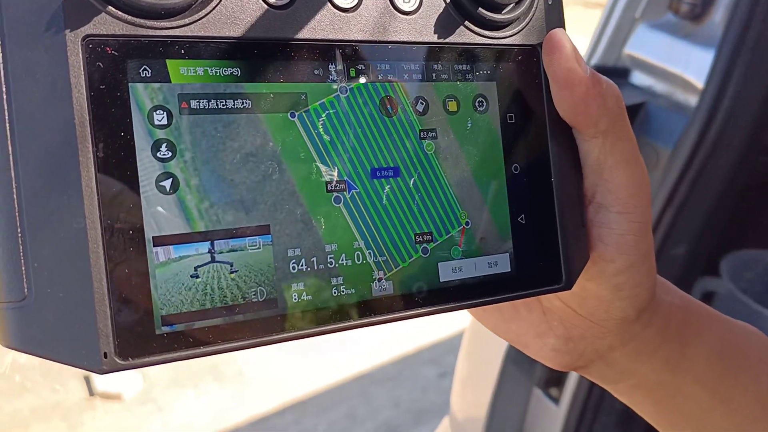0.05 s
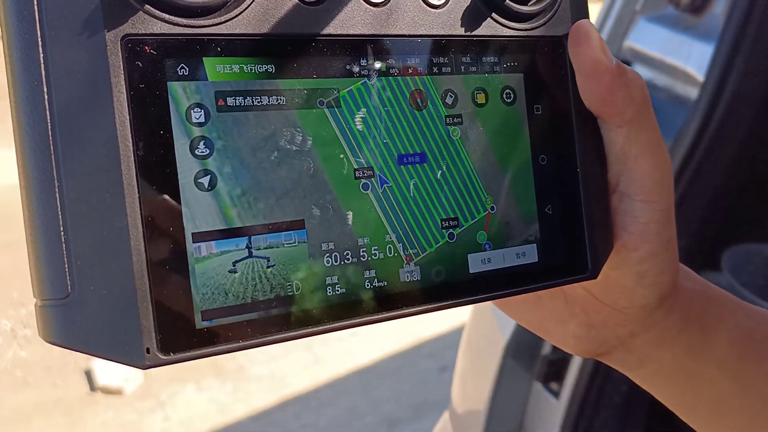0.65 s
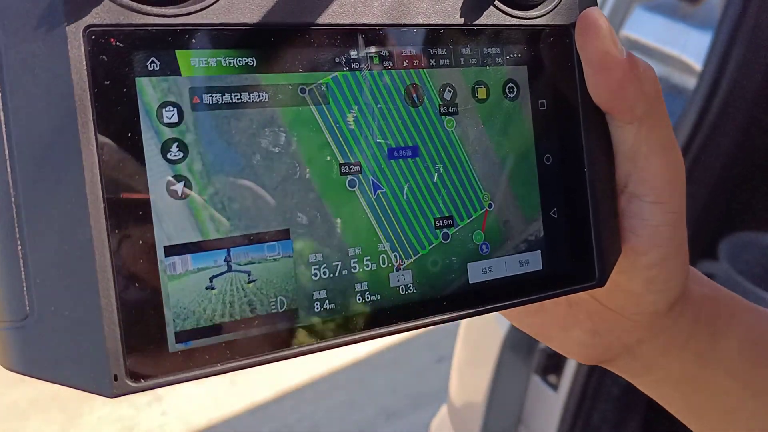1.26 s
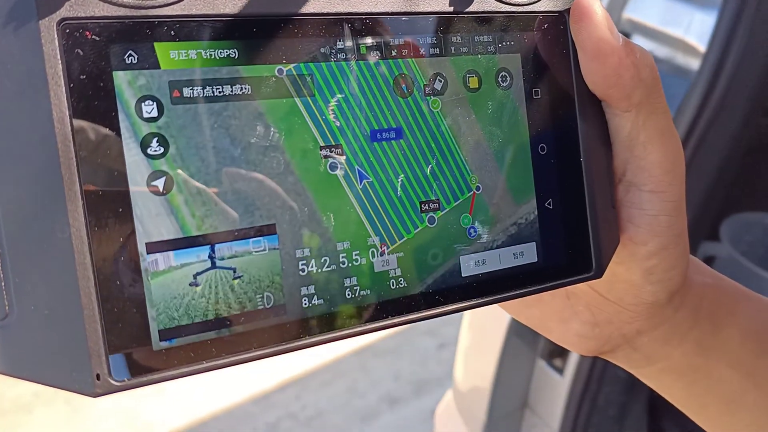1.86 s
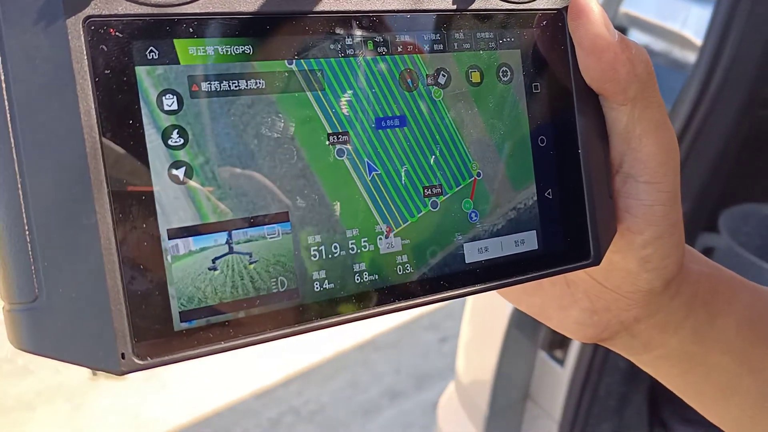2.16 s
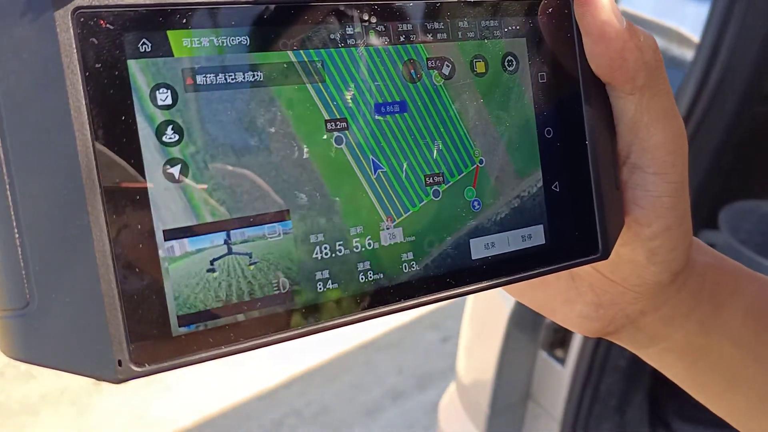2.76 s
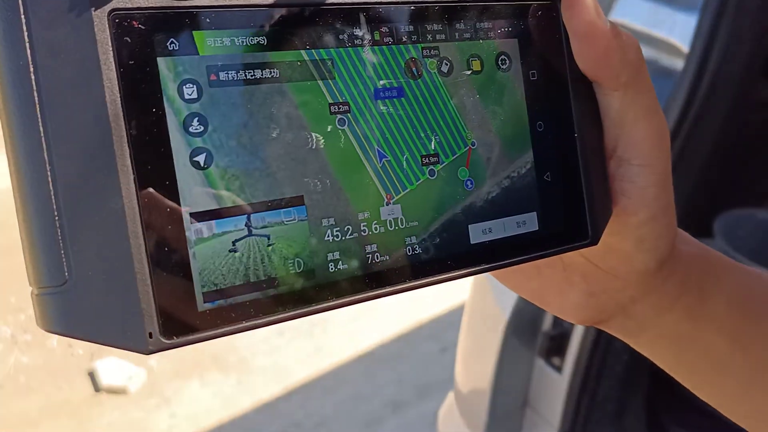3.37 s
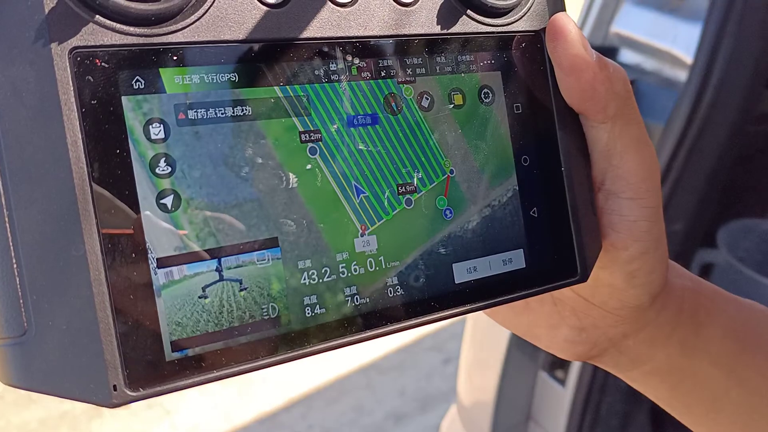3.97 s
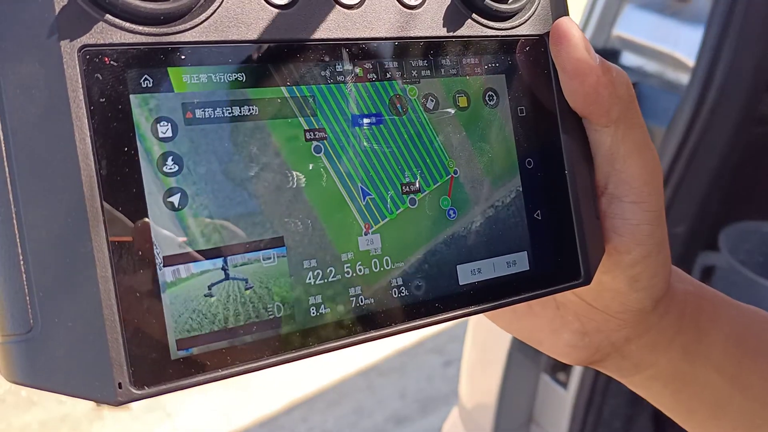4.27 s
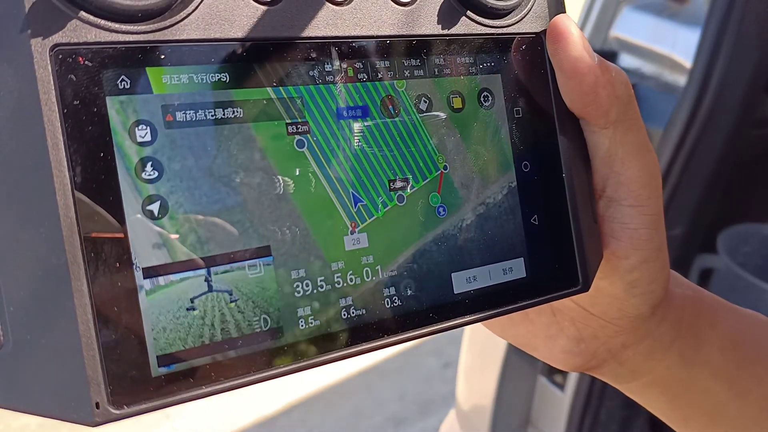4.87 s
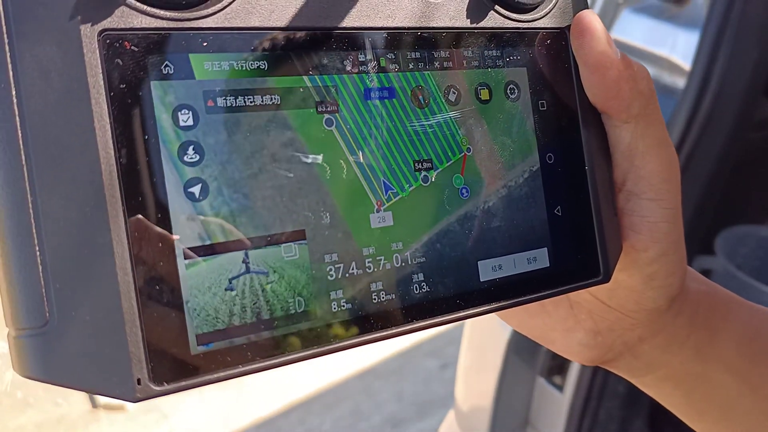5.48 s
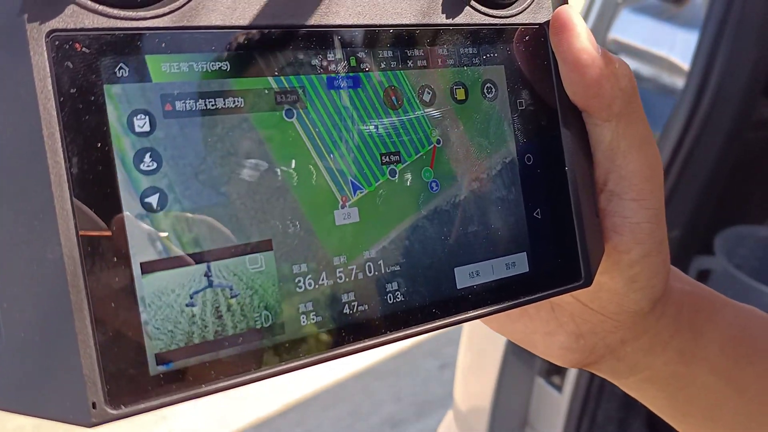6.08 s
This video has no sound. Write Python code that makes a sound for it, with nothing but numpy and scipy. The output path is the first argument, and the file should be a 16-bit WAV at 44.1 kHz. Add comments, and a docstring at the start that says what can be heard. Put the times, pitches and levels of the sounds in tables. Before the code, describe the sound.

Gusty wind buffets the microphone outdoors while a drone's low hum and rushing rotors draw steadily closer.

```python
"""At a field's edge, beside a parked vehicle's open door, a spraying drone flies closer in gusty wind.
Gusts cross two microphone ports, mostly the left; single eddies slap them and leave the air churning.
The hardest tick and push the recorder into its limiter. The rotors hum low and throw a throbbing
rush of air, coloured by the surfaces around the door. Their distant hiss swells and shimmers over
a low outdoor rumble. Thin chirps and a faint whine sit above."""
import sys
import numpy as np
from scipy import signal
from scipy.fft import rfft, irfft, next_fast_len
from scipy.io import wavfile
from scipy.ndimage import uniform_filter1d, minimum_filter1d

SR = 44100
rng = np.random.default_rng(int(sys.argv[2]) if len(sys.argv) > 2 else 0)


def unload_audio(sound):
    """Save the sound as a 16-bit wav file, at the path given as the first command line argument."""
    columns = np.transpose(np.atleast_2d(sound))
    # keep every value between -1 and 1, then stretch to whole-number steps
    steps = np.round(np.clip(columns, -1, 1) * 32767)
    wavfile.write(sys.argv[1], SR, steps.astype(np.int16))


N = 274302
TIME_S = np.arange(N) / SR
FRAME, OVERLAP = 1024, 768
BIN_HZ = np.fft.rfftfreq(FRAME, 1 / SR)


# Spells of turbulence: start_s, length_s, left_db, right_db
GUSTS = [(0, .028, -37, -66), (1.494, 0.16, -29, -66), (1.669, 0.17, -43, -67), (1.873, 0.13, -31, -56),
         (2.018, 0.093, -17.5, -34), (2.129, 0.25, -26.5, -44.5), (2.425, 0.095, -20.5, -65),
         (2.555, 0.19, -23.5, -23), (2.75, 0.066, -36, -36), (2.853, 0.18, -14, -32.5),
         (3.072, 0.16, -13.5, -27), (3.235, 0.058, -19.5, -24.5), (3.356, 0.062, -28.5, -51),
         (3.558, 0.078, -16, -51.5), (3.84, 0.13, -15.5, -41.5), (4.01, 0.19, -44.5, -54),
         (4.241, 0.049, -33, -31), (4.311, 0.15, -21.5, -22), (4.48, 0.19, -21, -23.5),
         (4.768, 0.17, -27, -42.5), (5.013, 0.1, -26, -34), (5.133, 0.14, -31, -76)]
# Single hard eddies: start_s, length_s, churn_db, slap_db, port
BUFFETS = [(1.469, 0.0051, -20, -39, "left"), (1.967, 0.0054, -14.5, -21, "left"),
           (2.034, 0.024, -18.5, -15.5, "left"), (2.102, 0.02, -23.5, -14.5, "left"),
           (2.257, .025, -19.5, -33.5, "left"), (2.408, 0.025, -14.5, -18.5, "left"),
           (2.658, 0.008, -11, -23, "left"), (2.857, 0.058, -12, -8.5, "left"),
           (3.009, 0.092, -24, -15, "right"), (3.069, 0.035, -9.5, 3.5, "left"),
           (3.089, 0.036, -8.5, -0.5, "left"), (3.15, 0.015, -10.5, -4, "left"),
           (3.205, 0.023, -8, -14, "left"), (3.314, 0.016, -13.5, -8, "left"),
           (3.343, 0.01, -12, -12.5, "left"), (3.515, 0.034, -27, -27, "left"),
           (3.58, .032, -14, -2, "left"), (3.694, 0.02, -27.5, -58, "left"),
           (3.827, 0.0085, -14, -8, "left"), (3.844, 0.021, -13.5, 2, "left"),
           (3.876, 0.01, -11, -5.5, "left"), (3.916, 0.0038, -6.5, -14, "left"),
           (4.243, 0.013, -22, -17, "right"), (4.323, .016, -18.5, -7.5, "right"),
           (4.345, .008, -19, -8, "right"), (4.39, 0.03, -17, -10, "left"),
           (4.506, 0.029, -10, -14.5, "left"), (4.597, 0.026, -15.5, -13.5, "left"),
           (4.688, 0.017, -11, -7, "left"), (4.739, 0.021, -14, -14, "left"),
           (4.965, 0.029, -14.5, -26.5, "left"), (5.021, 0.05, -29, -25, "right"),
           (5.336, 0.021, -34, -42, "right")]

def wind(port, gust_trim_db, gust_reach, buffet_reach, low_cut_hz, churn_trim_db=1):
    """Gusts and buffets at one port; eddy pitch follows air speed, the square root of pressure."""
    calm_hz, gust_rise_hz = 100, 197
    soft_buffet_hz, slap_rise_hz = 115.6, 162
    lead_s, slap_lag_s = 0.00407, 0.00097
    out = np.zeros(N)
    for start_s, length_s, left_db, right_db in GUSTS:
        gust_db = left_db if port == "left" else right_db
        eddy_hz = calm_hz + gust_rise_hz * np.sqrt(gain_of(gust_db))
        gust = turbulence(length_s, gust_db + gust_trim_db, eddy_hz, gust_reach, low_cut_hz, 0.0076)
        add(out, start_s - lead_s, gust)
    for start_s, length_s, churn_db, slap_db, side in BUFFETS:
        if side == port:
            eddy_hz = soft_buffet_hz + slap_rise_hz * np.sqrt(gain_of(slap_db))
            level_db = churn_db + churn_trim_db
            churn = turbulence(length_s, level_db, eddy_hz, buffet_reach, low_cut_hz, 0.0048)
            add(out, start_s - lead_s, churn)
            pulse = slap(slap_db)
            add(out, start_s + slap_lag_s - len(pulse) / 2 / SR, pulse)
    return out


def turbulence(length_s, level_db, eddy_hz, reach, low_cut_hz, fade_s, ref_db=-23, db_per_decade=130):
    """A burst of lumpy air; faster, harder eddies reach higher in pitch."""
    t = np.arange(SR // 2) / SR
    envelope = np.clip(t / fade_s, 0, 1) * np.exp(-np.maximum(t - length_s, 0) / fade_s)
    eddies = rng.standard_normal(len(t)) * envelope * gain_of(4 * wander(len(t), rate_hz=90))
    top_hz = reach * eddy_hz * 10 ** ((level_db - ref_db) / db_per_decade)
    low_cut = signal.butter(4, low_cut_hz, "high", fs=SR, output="sos")
    slope = signal.butter(1, np.clip(0.34 * eddy_hz, 50, 2000), fs=SR, output="sos")
    roll_off = signal.butter(5, np.clip(top_hz, 100, 2000), fs=SR, output="sos")
    pressure = signal.sosfilt(np.vstack([low_cut, slope, roll_off]), eddies)
    return gain_of(level_db) * unit_rms(pressure) * np.sqrt(length_s / t[-1])


def slap(peak_db, ref_width_s=0.00055, ref_db=-8, db_per_decade=70):
    """One eddy passing a port: a pull and a push, briefer the harder it is."""
    t = np.arange(-SR // 100, SR // 100) / SR
    width_s = ref_width_s * 10 ** (-(peak_db - ref_db) / db_per_decade)
    position = t / width_s
    return gain_of(peak_db) * position * np.exp((1 - position ** 2) / 2)


# Left-port overloads: start_s, level_db
TICKS = [(3.1507, -46), (3.211, -56), (3.312, -58), (3.5708, -47), (3.6306, -54), (3.8307, -39),
         (3.9709, -57)]

def overload_ticks(trim_db=12, core_db=11, decay_s=0.0002, lag_s=0.001):
    """Short, bright ticks on the hardest pushes, each with a duller core."""
    out = np.zeros(N)
    t = np.arange(SR // 100) / SR
    core = gain_of(core_db) * t / decay_s * np.exp(1 - t / decay_s)
    for start_s, level_db in TICKS:
        tick = rng.standard_normal(len(t)) * np.exp(-t / decay_s)
        add(out, start_s + lag_s, gain_of(level_db + trim_db) * (tick / abs(tick).max() + core))
    return out


# Drone nearing: time_s, gain_db
APPROACH = [(0, -30), (1.5, -15.5), (2.7, -24), (3.6, -17), (4.3, -14), (4.65, -8), (5.25, -6), (5.75, -2),
            (6.03, -2.5), (6.22, -5)]

def drone(blade_hz=76.5):
    """Rotor rush and hum, louder as the drone nears."""
    approach_db = np.interp(TIME_S, *np.transpose(APPROACH))
    return (rotor_rush(blade_hz, approach_db) + rotor_hum(blade_hz)) * gain_of(approach_db)


# Smooth part of the rush: freq_hz, left_db_per_hz, right_db_per_hz
RUSH_SPECTRUM = [(30, -80, -106), (60, -85, -71), (119, -67, -72), (203, -74.5, -76.5), (447, -79, -86),
                 (800, -97.5, -79.5), (1400, -88.5, -84), (3000, -96.5, -81.5), (5000, -99, -92),
                 (6840, -106, -98), (7740, -118, -99), (8050, -135, -135)]
# Bands reinforced by reflections at each port: centre_hz, width_hz, level_db_per_hz
LEFT_REFLECTIONS = [(610, 150, -69.5), (1070, 190, -76.5), (1440, 190, -77.5), (2040, 220, -83),
                    (2680, 480, -85), (3386, 190, -84.5), (4400, 530, -86), (6100, 300, -89.5)]
RIGHT_REFLECTIONS = [(320, 50, -68), (660, 590, -76), (1117, 150, -70), (1750, 200, -90), (2570, 200, -74),
                     (2857, 35, -68), (3340, 270, -74), (3920, 280, -74.5), (4810, 270, -74),
                     (5170, 370, -75.5), (5910, 280, -73.5), (7060, 320, -89)]

def rotor_rush(blade_hz, approach_db, patchy_db=4, throb_depth=0.3, drift_per_s=0.014, dull_hz=9000):
    """Blade turbulence, reaching the left port first and throbbing with each blade."""
    frame_s, noise = port_noise(coherence=0.84, right_lag_s=0.000457)
    # The bands slide with the angle of arrival.
    sway = 0.0063 * np.interp(frame_s, TIME_S, wander(N, 15))
    slide = drift_per_s * (frame_s - 5.85) + sway
    slid_hz = BIN_HZ * (1 + slide[:, None])
    band_power = [sum(gain_of(level_db) ** 2 * 2 ** -((2 * (slid_hz - centre_hz) / width_hz) ** 2)
                      for centre_hz, width_hz, level_db in bands)
                  for bands in (LEFT_REFLECTIONS, RIGHT_REFLECTIONS)]
    colour = np.sqrt(gain_of(port_spectra_db(RUSH_SPECTRUM)) ** 2 + np.array(band_power))
    # Distance takes the treble first.
    distance_db = np.interp(frame_s, TIME_S, approach_db)[:, None] * BIN_HZ / dull_hz
    flicker_db = patchy_db * patches(noise.shape, frames=16, bins=5)
    rush = sound_of(noise * colour * gain_of(distance_db + flicker_db))
    passes = wavering_cycles(blade_hz, depth=0.009, waver_hz=2.3)
    return rush * (1 + throb_depth * np.cos(2 * np.pi * passes))


# Blade-rate lines: harmonic, level_db
HUM_HARMONICS = [(1, -54.5), (2, -47), (3, -72), (4, -65.5)]

def rotor_hum(blade_hz, flutter_db=2):
    """Low harmonics of the blade rate, wavering as the motors hold course."""
    passes = wavering_cycles(blade_hz, depth=0.0027, waver_hz=9.9)
    hum = np.zeros(N)
    for harmonic, level_db in HUM_HARMONICS:
        amplitude = np.sqrt(2) * gain_of(level_db + flutter_db * wander(N, 5))
        hum += amplitude * np.sin(2 * np.pi * harmonic * passes)
    return pan(hum, left_db=-1, right_db=1)


# Rumble and far rotor hiss at rest: freq_hz, left_db_per_hz, right_db_per_hz
FAR_SPECTRUM = [(25, -99.2, -100.1), (59.6, -71.5, -72), (125, -82, -83), (239, -86, -82.5),
                (460, -92, -89), (1310, -94.5, -96), (2330, -99.5, -95.5), (3520, -100.4, -89.5),
                (4240, -102.7, -94.5), (5400, -102.9, -86.5), (6614, -111.4, -86.5), (7424, -120.1, -102.6),
                (8020, -125.7, -126.8), (13800, -137.4, -138.7)]
# Swell of the far rotor hiss: time_s, level_db
HISS_SWELL = [(0, -61), (0.5, -61), (1.3, -57), (1.55, -52), (2.1, -48.5), (2.4, -47.5), (2.65, -45.5),
              (3.1, -49.5), (4.1, -55), (4.7, -51), (4.92, -44.5), (5.1, -53.5), (5.45, -59.5), (6.0, -48),
              (6.22, -48)]

def far_rotor_hiss_and_rumble(rest_db=-59, shimmer_db=1.87):
    """The drone's distant rotor hiss, swelling and shimmering over a low outdoor rumble."""
    coherence = 0.33 * np.exp(-(BIN_HZ / 4500) ** 2)
    frame_s, noise = port_noise(coherence, right_lag_s=0.00042)
    swell_db = np.interp(frame_s, *np.transpose(HISS_SWELL)) - rest_db
    swell_db += shimmer_db * np.interp(frame_s, TIME_S, wander(N, 24))
    bin_share = np.interp(BIN_HZ, [200, 1300, 2500, 7000, 10000], [0.49, 0.47, 0.74, 0.65, 0.79])
    port_share = np.array([0.8, 1.0])[:, None, None]
    level_db = port_spectra_db(FAR_SPECTRUM) + swell_db[:, None] * bin_share * port_share
    patchy_db = 2 - 3 * np.exp(-BIN_HZ / 400)
    level_db += patchy_db * patches(noise.shape, frames=12, bins=8)
    return sound_of(noise * gain_of(level_db))


def chirps(pitch_hz=4980, width_hz=110, rate_hz=8, uneven_db=0.3):
    """Thin, uneven, insect-like chirps near the right port."""
    cycles = wavering_cycles(rate_hz, depth=0.3, waver_hz=4.5)
    strokes = np.sin(np.pi * cycles) ** 4 * gain_of(uneven_db * wander(N, 4))
    return pan(unit_rms(narrow_noise(pitch_hz, width_hz) * strokes), left_db=-81, right_db=-62.5)


def whine(pitch_hz=13117, width_hz=10, swell_db=17, peak_s=5.24, swell_width_s=0.094):
    """A faint electronic whine that swells once."""
    tone = unit_rms(narrow_noise(pitch_hz, width_hz))
    swell = np.exp(-((TIME_S - peak_s) / swell_width_s) ** 2)
    return pan(tone * gain_of(swell_db * swell), left_db=-104, right_db=-111)


def gain_of(db):
    """Decibels to amplitude."""
    return 10 ** (np.asarray(db) / 20)


def unit_rms(x):
    """Scales to rms 1."""
    return x / np.sqrt(np.mean(x ** 2) + 1e-20)


def add(mix, start_s, sound):
    """Mixes a sound in at start_s."""
    part = mix[max(round(start_s * SR), 0):][:len(sound)]
    part += sound[:len(part)]


def pan(sound, left_db, right_db):
    """Mono to two ports."""
    return sound * gain_of([[left_db], [right_db]])


def wander(samples, rate_hz):
    """Smooth random motion of rms about 1, up to about rate_hz."""
    size = next_fast_len(max(samples, SR))
    freq_hz = np.fft.rfftfreq(size, 1 / SR)
    spectrum = rfft(rng.standard_normal(size)) * np.exp(-(freq_hz / rate_hz) ** 2)
    return unit_rms(irfft(spectrum, size))[:samples]


def wavering_cycles(rate_hz, depth, waver_hz):
    """Running cycle count of an unsteady rate."""
    return np.cumsum(rate_hz * (1 + depth * wander(N, waver_hz))) / SR


def narrow_noise(pitch_hz, width_hz):
    """A thin noise band around pitch_hz."""
    envelope = wander(N, width_hz) + 1j * wander(N, width_hz)
    return (envelope * np.exp(2j * np.pi * pitch_hz * TIME_S)).real


def port_noise(coherence, right_lag_s):
    """Frame times and spectra (port, frame, bin) of partly shared white noise at 0 dB per Hz."""
    white = rng.standard_normal((2, N)) * np.sqrt(SR / 2)
    _, frame_s, spectra = signal.stft(white, SR, nperseg=FRAME, noverlap=OVERLAP)
    left, unrelated = spectra.transpose(0, 2, 1)
    delayed = left * np.exp(-2j * np.pi * BIN_HZ * right_lag_s)
    right = coherence * delayed + np.sqrt(1 - coherence ** 2) * unrelated
    return frame_s, np.array([left, right])


def port_spectra_db(table):
    """Left and right levels (port, 1, bin), interpolated in log frequency."""
    freq_hz, *sides_db = np.transpose(table)
    return np.array([np.interp(np.log(BIN_HZ + 1), np.log(freq_hz), db) for db in sides_db])[:, None]


def patches(shape, frames, bins):
    """Random time-frequency blotches of rms 1."""
    slow = uniform_filter1d(rng.standard_normal(shape), frames, axis=1)
    return unit_rms(uniform_filter1d(slow, bins, axis=2))


def sound_of(spectra):
    """Short-time spectra to sound."""
    return signal.istft(spectra.transpose(0, 2, 1), nperseg=FRAME, noverlap=OVERLAP)[1][:, :N]


def scene():
    """Separate wind at each port; drone, rumble, chirps and whine at both."""
    rotors = drone()
    left = wind("left", gust_trim_db=1, gust_reach=1.806, buffet_reach=1.958, low_cut_hz=84.5)
    left += overload_ticks()
    right = wind("right", gust_trim_db=-1, gust_reach=2.93, buffet_reach=2.53, low_cut_hz=67.4)
    return np.array([left, right]) + rotors + far_rotor_hiss_and_rumble() + chirps() + whine()


def record(dry, ceiling_db=-2.65, recovery_db_per_s=230, cutoff_hz=15740):
    """A fast limiter ducks both channels on the hardest gusts; a low-pass follows."""
    over_db = np.maximum(20 * np.log10(abs(dry).max(0) + 1e-9) - ceiling_db, 0)
    recovery_db = TIME_S * recovery_db_per_s
    held_db = np.maximum.accumulate(over_db + recovery_db) - recovery_db
    look_ahead_db = minimum_filter1d(-held_db, size=80)
    duck_db = uniform_filter1d(uniform_filter1d(look_ahead_db, size=40), size=40)
    low_pass = signal.firwin(511, cutoff_hz, window=("kaiser", 9), fs=SR)
    return signal.oaconvolve(dry * gain_of(duck_db), low_pass[None], "same")


dry = scene()
out = record(dry)
unload_audio(out)
```